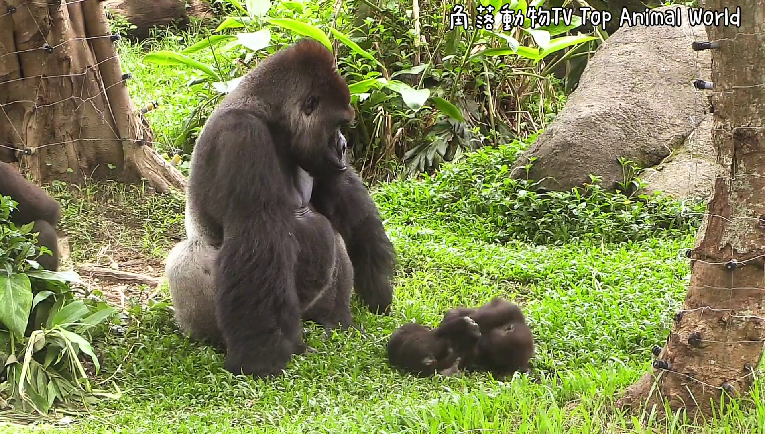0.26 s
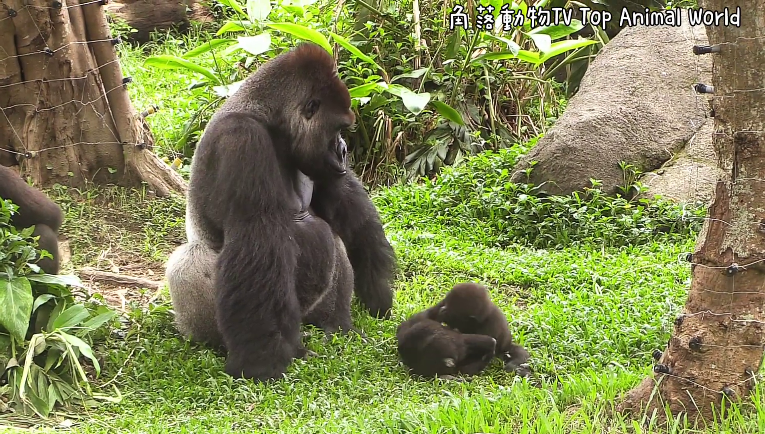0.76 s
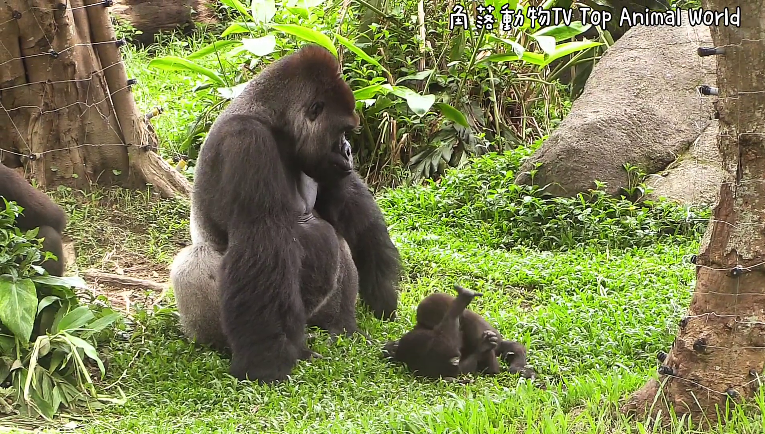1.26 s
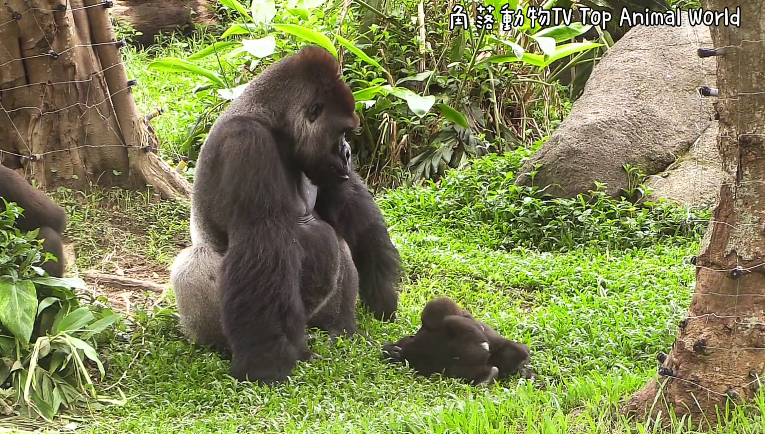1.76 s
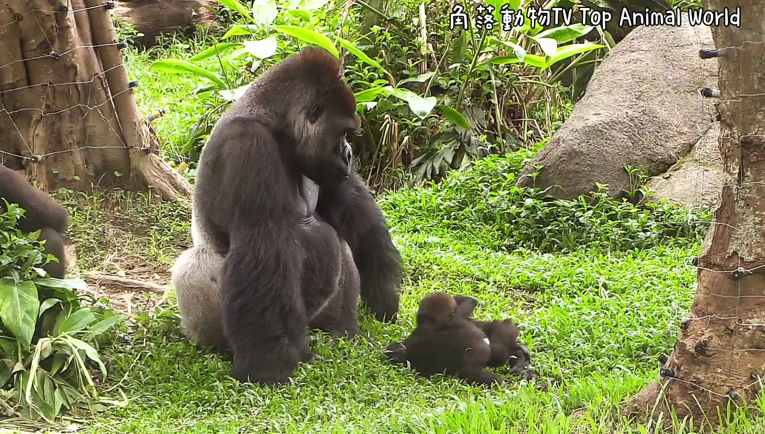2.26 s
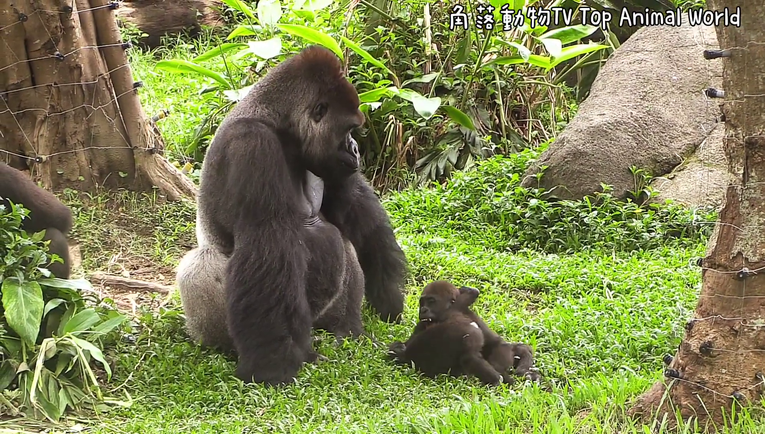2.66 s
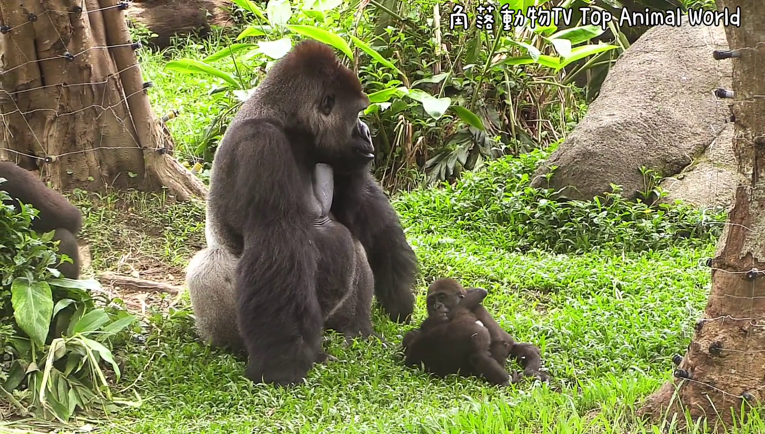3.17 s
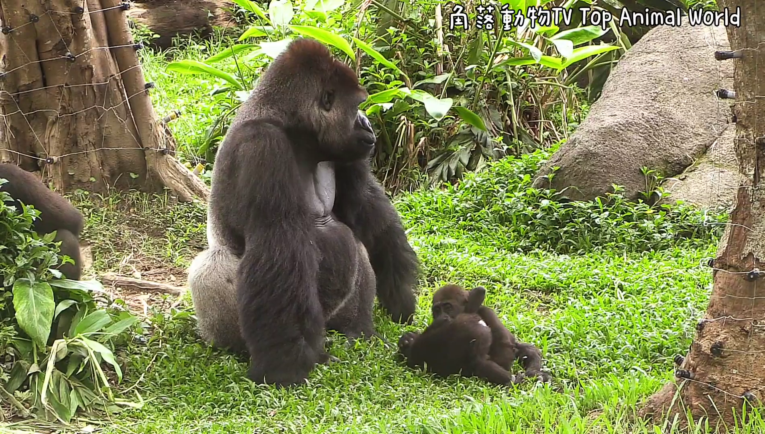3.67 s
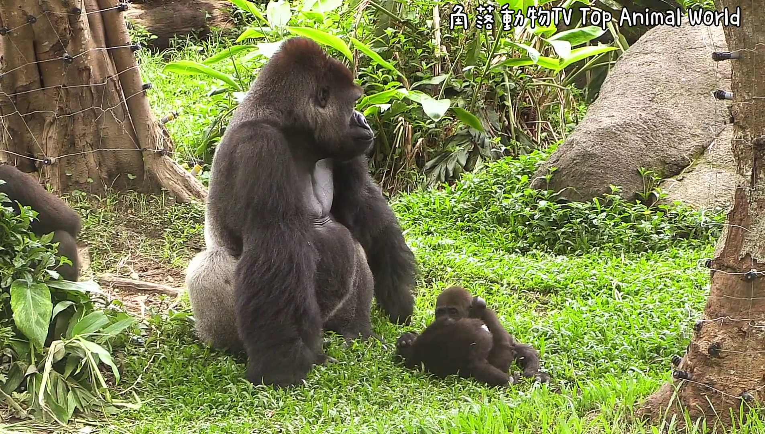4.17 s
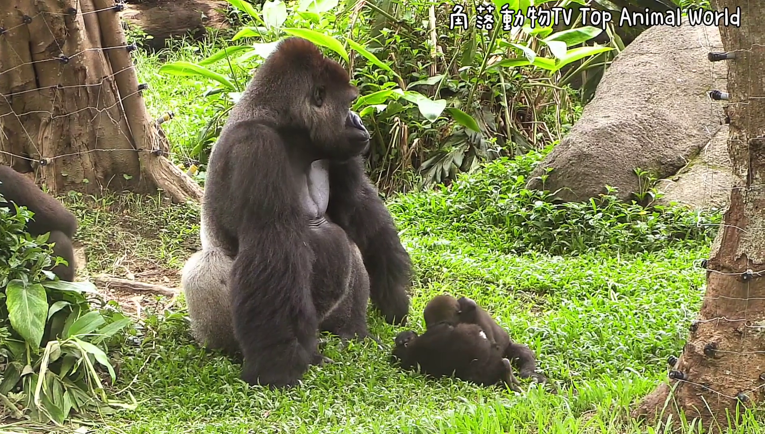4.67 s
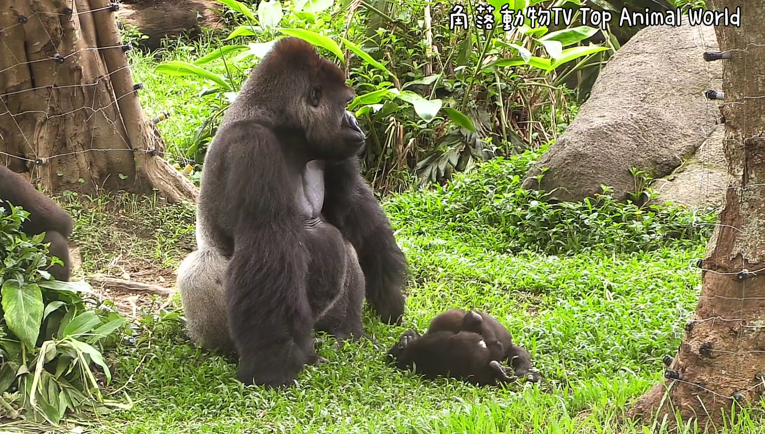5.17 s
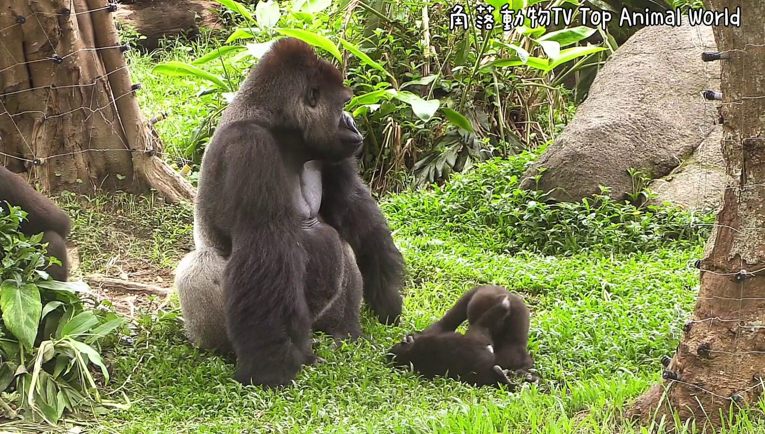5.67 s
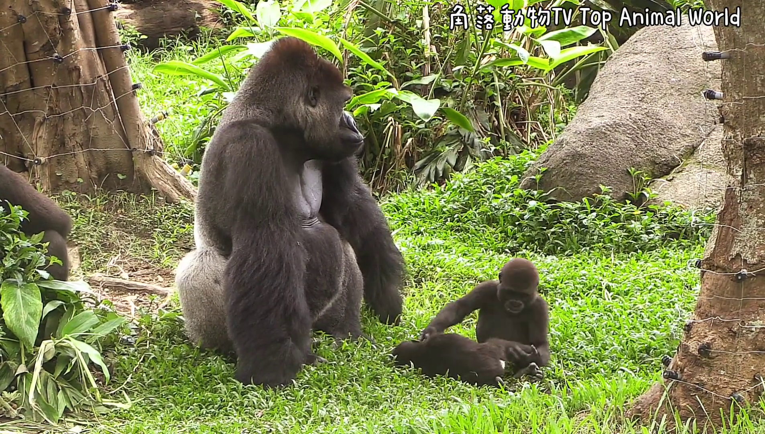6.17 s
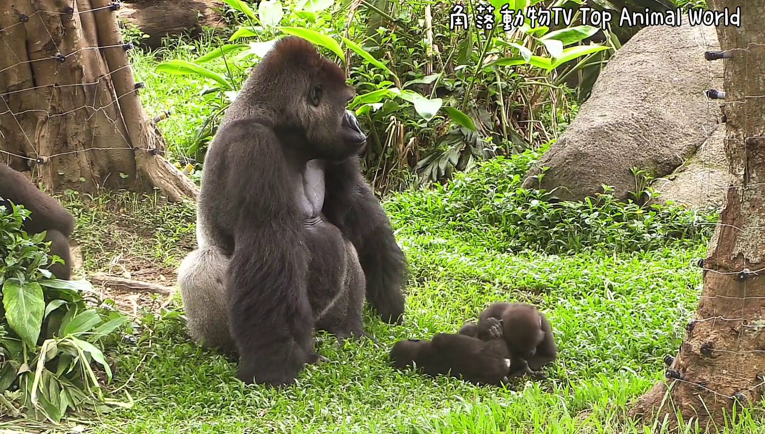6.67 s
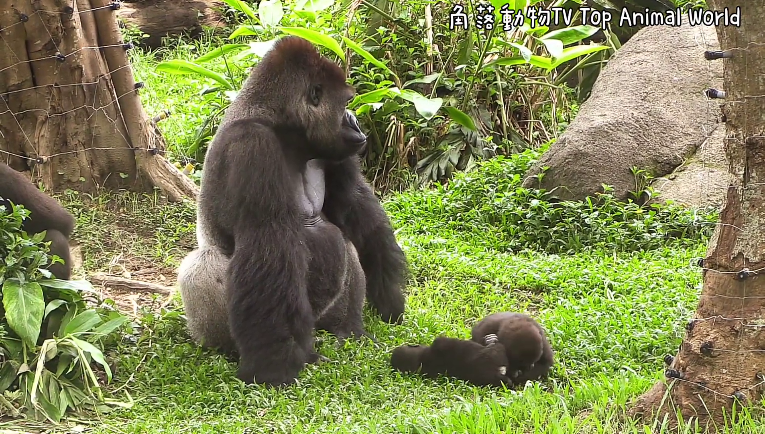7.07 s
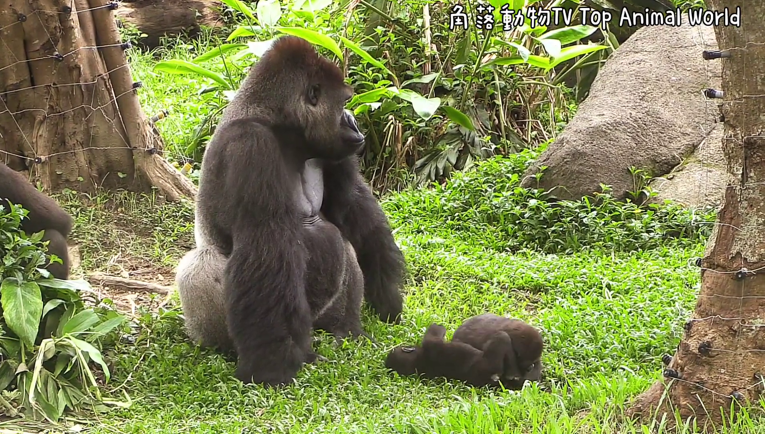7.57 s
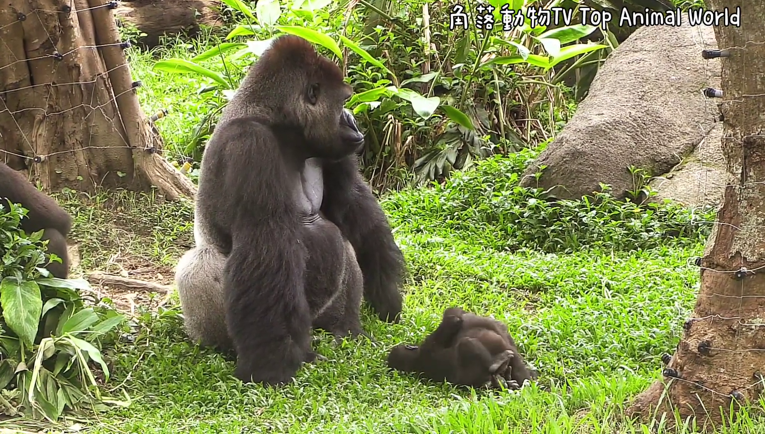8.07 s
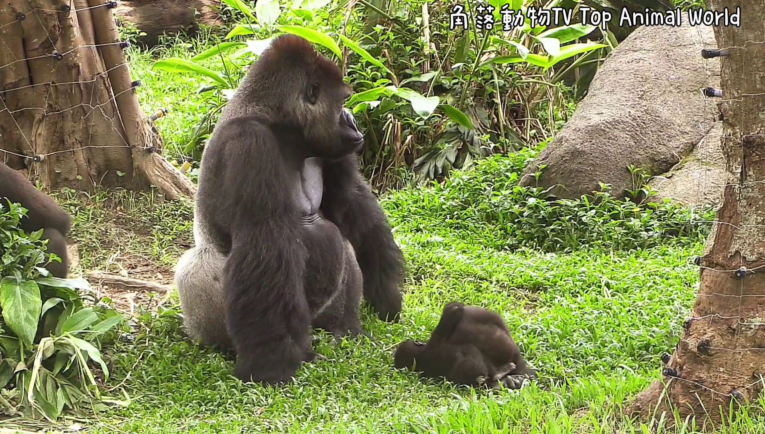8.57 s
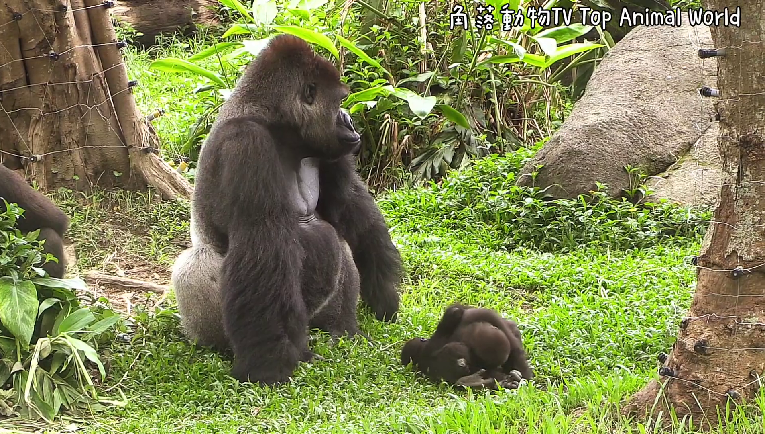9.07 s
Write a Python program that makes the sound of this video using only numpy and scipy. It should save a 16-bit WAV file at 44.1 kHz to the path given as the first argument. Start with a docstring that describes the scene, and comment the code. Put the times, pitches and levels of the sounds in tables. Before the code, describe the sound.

Quiet outdoor air and a thin, very high insect hiss lie beneath birdsong. Mellow, nearly pure whistles begin at left and are answered more strongly at right, while soft falling calls repeat farther off. The middle has an upward flick and quick buzz; later comes a long rising and sinking left whistle, then a warbling soft note among raspy chips. Wide stereo, at some distance, with short woody echo.

```python
"""From the start a bird whistles at the left in gliding near-sine tones, over a noise wash of outdoor air,
drifting hiss from insects, and a faint random chorus; thin high calls, chips and far falling calls soon join.
After 2 s a bird at the right answers, and the insect hiss sinks; near 4.5 s come one upward flick and a
buzzy double call. Past 6 s the left bird arches one long whistle; more flicks follow after 7 s, with chips.
A leafy enclosure of rocks and trunks adds early bounces, a decaying noise tail and late slaps to the birds."""
import sys
import numpy as np
from scipy import signal
from scipy.fft import rfft, irfft
from scipy.io import wavfile
from scipy.ndimage import uniform_filter1d

SR = 44100
rng = np.random.default_rng(int(sys.argv[2]) if len(sys.argv) > 2 else 0)


def wav_out(sig):
    """Save sig, one row per channel (or a flat mono array), as 16-bit PCM at SR to the path in sys.argv[1]."""
    wavfile.write(sys.argv[1], SR, np.round(np.clip(np.atleast_2d(sig).T, -1, 1) * 32767).astype(np.int16))


N = 411012  # samples, about 9.3 s


def gain_of(db):
    """Level law: an amplitude ratio is 10 to the power dB/20."""
    return 10 ** (np.asarray(db) / 20)


def evened(x):
    """Normalization: equal mean power, rms 1."""
    return x / np.sqrt(np.mean(x ** 2) + 1e-20)


def read(points, hz):
    """Logarithmic frequency scale: interpolates a table along it."""
    f, value = np.transpose(points)
    return np.interp(np.log(hz + 1), np.log(f + 1), value)


def add(mix, s, sound):
    """Superposition: sums a stereo sound into the mix at time s, trimmed to fit."""
    start = round(s * SR)
    sound = sound[:, max(-start, 0):]
    part = mix[:, max(start, 0):][:, :sound.shape[1]]
    part += sound[:, :part.shape[1]]


def wander(rate_hz):
    """Band-limited fluctuation: one second of Gaussian-filtered noise, rms 1."""
    hz = np.fft.rfftfreq(SR, 1 / SR)
    spectrum = rfft(rng.standard_normal(SR)) * np.exp(-(hz / rate_hz) ** 2)
    return evened(irfft(spectrum, SR))


def note(pan_db, warble_hz, rate, path, rasp_hz=16, flutter_db=2.4, overtone_db=-42, lag_per_db=1.6e-5):
    """Frequency modulation: a near-sine whistle glides along (t/s, f/Hz, level/dB) and warbles."""
    s, pitch, level = np.transpose(path)
    t = np.arange(s[0], max(s[-1], s[0] + .02), 1 / SR)
    hz = uniform_filter1d(np.interp(t, s, pitch), size=300)
    hz += rasp_hz * wander(250)[:len(t)]
    warble_rate = rate * (1 + .28 * wander(60)[:len(t)])  # no two shakes alike
    cycles = np.cumsum(warble_rate) / SR
    depth_hz = np.interp(t, s, warble_hz * np.ones(len(s)))
    hz += depth_hz * np.sin(2 * np.pi * cycles)

    ramp = np.clip(np.minimum(t - t[0], t[-1] - t) / .005, 0, 1)  # 5 ms at either end
    fade = np.sin(np.pi / 2 * ramp) ** 2
    flutter = flutter_db * wander(60)[:len(t)]
    loud = fade * gain_of(np.interp(t, s, level) + flutter)

    side = np.array([[.5], [-.5]]) * pan_db  # the nearer side hears it louder and sooner
    phase = 2 * np.pi * (np.cumsum(hz) / SR + hz * side * lag_per_db)
    tone = np.sin(phase) + gain_of(overtone_db) * np.sin(2 * phase)
    return s[0], np.sqrt(2) * loud * evened(gain_of(side)) * tone


def song(notes):
    """Superposition: the sum of a list of notes."""
    out = np.zeros((2, N))
    for row in notes:
        add(out, *note(*row))
    return out


EDGE_DROP_DB = 7  # softer at either end than at the loudest point
SWELL_SHAPE = 1.6  # 1 = pointed swell, 2 = rounded


def swell(share, db, loudest_at):
    """Amplitude envelope: level rises to its loudest point and sinks again."""
    peak = np.clip(loudest_at, .02, .98)
    distance = np.interp(share, [0, peak, 1], [1, 0, 1])
    return db - EDGE_DROP_DB * distance ** SWELL_SHAPE


def slur(start, length, first_hz, middle_hz, last_hz, db, loudest_at, warble_hz, rate, pan_db):
    """Parabolic glide: pitch bends in one smooth arc through three frequencies."""
    share = np.linspace(0, 1, 25)
    bow_hz = middle_hz - (first_hz + last_hz) / 2
    straight_hz = first_hz + (last_hz - first_hz) * share
    hz = straight_hz + bow_hz * (1 - (2 * share - 1) ** 2)
    path = np.transpose([start + length * share, hz, swell(share, db, loudest_at)])
    return pan_db, warble_hz, rate, path


THROAT_DB_PER_OCTAVE = 28  # fading as pitch leaves the throat's resonance
WHISTLE_RISE_S, WHISTLE_START_DB = .05, -9  # soft onset


def long_whistle(curve, db, throat_hz):
    """Resonance: a whistle's level falls with its distance in octaves from the throat's resonance."""
    s, pitch = np.transpose(curve)
    t = np.linspace(s[0], s[-1], 100)
    hz = np.interp(t, s, pitch)
    onset_db = WHISTLE_START_DB * np.clip(1 - (t - t[0]) / WHISTLE_RISE_S, 0, 1)
    detuning_db = THROAT_DB_PER_OCTAVE * abs(np.log2(hz / throat_hz))
    return np.transpose([t, hz, db + onset_db - detuning_db])


LEFT_PAN_DB = 6.5  # left minus right
# short whistles, before the enclosure: (t/s, length/s, first f/Hz, middle f/Hz, last f/Hz, level/dB,
# loudest point as share of length, warble depth f/Hz, mean warble rate f/Hz)
LEFT_NOTES = [ (-.02, .16, 2240, 2200, 2070, -45, .45, 300, 70),
              (.70, .06, 1590, 1690, 1950, -50, .7, 20, 50),
              (.752, .06, 1990, 2110, 2080, -44.5, .45, 10, 50),
              (.822, .105, 2040, 1990, 1900, -46.5, .5, 10, 50),
              (1.007, .04, 2010, 1880, 1770, -49, .6, 20, 50),
              (1.045, .16, 1730, 1720, 1730, -49.5, .35, 70, 42),
              (1.233, .105, 2310, 2225, 2080, -39, .35, 10, 50),
              (1.343, .068, 2100, 2250, 2255, -39, .45, 10, 50),
              (1.772, .115, 1920, 1990, 2040, -44, .6, 50, 55),
              (5.64, .105, 1370, 1460, 1580, -59.5, .7, 10, 50),
              (5.925, .065, 2100, 2010, 1880, -44, .35, 45, 30),
              (5.98, .25, 1880, 1860, 1810, -46.5, .25, 45, 30),
              (7.13, .11, 1720, 1690, 1640, -53, .45, 10, 50),
              (7.23, .055, 1660, 1520, 1320, -55, .15, 10, 50)]
# pitch curve of the long whistle: (t/s, f/Hz)
LEFT_LONG_WHISTLE = [(6.38, 1987), (6.41, 2020), (6.49, 2370), (6.538, 2690), (6.61, 2740), (6.69, 2660),
                     (6.774, 2029), (6.825, 1800), (6.868, 1450), (6.925, 1260)]


def left_bird(warble_hz=12, rate=40):
    """Gliding whistle: short slurs and one long, clean tone that climbs and sinks through resonance."""
    path = long_whistle(LEFT_LONG_WHISTLE, db=-40.5, throat_hz=2130)
    arch = (LEFT_PAN_DB, warble_hz, rate, path)
    return song([slur(*row, LEFT_PAN_DB) for row in LEFT_NOTES] + [arch])


# thin calls, before the enclosure: (t/s, length/s, first f/Hz, middle f/Hz, last f/Hz, level/dB,
# loudest point as share of length, warble depth f/Hz, mean warble rate f/Hz, left minus right level/dB)
SMALL_BIRD_NOTES = [ (-.02, .23, 7950, 7790, 7680, -56.5, .2, 30, 70, .7),
                    (.46, .05, 3620, 3660, 3700, -46.5, .4, 75, 165, 8),
                    (.75, .07, 3040, 3180, 3150, -57, .65, 10, 50, 8),
                    (.81, .125, 3150, 2980, 2900, -57, .3, 10, 50, 8),
                    (.985, .04, 2560, 2850, 2960, -50, .4, 40, 90, 10),
                    (1.57, .075, 2660, 2920, 2770, -46, .5, 50, 90, 5),
                    (1.67, .105, 2830, 2970, 3200, -47, .65, 30, 90, 5),
                    (3.76, .07, 8170, 8180, 8150, -55, .9, 20, 70, .5),
                    (3.825, .225, 8160, 8010, 7790, -46.5, .45, 40, 70, .5),
                    (4.07, .17, 7820, 7760, 7770, -51.5, .2, 30, 70, .5),
                    (7.49, .14, 7880, 7380, 7270, -63, .5, 60, 70, 0)]


def small_birds():
    """Frequency modulation: thin, warbling slurs, the highest near 8 kHz."""
    return song([slur(*row) for row in SMALL_BIRD_NOTES])


# decay time of the scattered tail, to -60 dB: (f/Hz, t/s)
DECAY_TIMES = [(1500, .68), (2300, .8), (4000, .6), (8000, .5)]
# late reflections from far walls, relative to the early bounces: (delay t/s, level/dB)
LATE_SLAPS = [(.21, -29), (.315, -33)]


def enclosure(x, direct_db, early_db, tail_db):
    """Reverberation: direct sound, bounces off ground and rock, a tail scattered by trees, late slaps."""
    count = 8  # bounces per channel
    early = np.zeros((2, SR))
    at = (rng.uniform(.002, .045, (2, count)) * SR).astype(int)
    signs = rng.choice([-1, 1], at.shape)
    np.put_along_axis(early, at, signs / np.sqrt(count), 1)

    hz, t, z = signal.stft(rng.standard_normal((2, SR)), SR, nperseg=256)
    decay = gain_of(-60 * t / read(DECAY_TIMES, hz)[:, None])
    z *= decay * (1 - np.exp(-t / .01))  # the tail builds up over about 10 ms
    tail = signal.istft(z, SR, nperseg=256)[1][:, :SR]
    tail = evened(tail) / np.sqrt(SR)  # unit mean energy per channel

    bounces = signal.fftconvolve(x, early, axes=1)[:, :N]
    crossed = x + .3 * x[::-1]  # some of each side reaches the other
    scattered = signal.fftconvolve(crossed, tail, axes=1)[:, :N]
    out = gain_of(direct_db) * x + gain_of(early_db) * bounces + gain_of(tail_db) * scattered
    for delay, db in LATE_SLAPS:
        add(out, delay, gain_of(db) * bounces[::-1])  # from the opposite side
    return out


AIR_DB = -62.5  # rms level
# relative spectral density of the outdoor air: (f/Hz, level/dB)
AIR_SPECTRUM = [(25, -24), (48, -23), (85, -34), (190, -29), (300, -21), (450, -10), (750, -3.5),
                (1300, -4), (2200, -2), (3500, -7), (4400, -7), (4720, -2), (5100, -9.5), (8500, -11),
                (15000, -11.5)]
# left-right coherence of the outdoor air: (f/Hz, correlation 0-1)
AIR_COHERENCE = [(30, .9), (80, .7), (200, 0), (3500, .05), (6500, .1), (8500, .95)]


def air():
    """Partial coherence: a steady noise wash of distant leaves and town, widest in mid-range."""
    hz = np.fft.rfftfreq(N, 1 / SR)
    a, b = rfft(rng.standard_normal((2, N)))
    same = np.clip(read(AIR_COHERENCE, hz), -1, 1)
    right = same * a + np.sqrt(1 - same ** 2) * b
    z = np.array([a, right]) * gain_of(read(AIR_SPECTRUM, hz))
    return gain_of(AIR_DB) * evened(irfft(z, N))


# relative spectral density of the insect hiss: (f/Hz, level/dB)
INSECT_SPECTRUM = [(7000, -43), (9300, -23), (10000, -15), (11200, -15), (11900, -9), (12400, -4),
                   (13200, -4), (14000, 0), (15450, -3), (15700, -40)]
# level course of the insect hiss: (t/s, level/dB)
INSECT_COURSE = [(0, -52), (2.35, -53), (2.65, -60.5), (3.1, -62), (3.25, -69.5), (4.2, -69.5), (4.8, -64),
                 (6.2, -63), (7.4, -61), (9.3, -62)]


def insects(ridge_db=3.8, flicker_db=1, width=.12):
    """Filtered noise: a high hiss with narrow spectral ridges that drift over seconds."""
    frames, hz = N // 512 + 5, np.fft.rfftfreq(2048, 1 / SR)
    a, b, c, d, ridges = rng.standard_normal((5, frames, len(hz)))
    ridges = uniform_filter1d(ridges, size=200, axis=0, mode="wrap")  # slow in time
    ridges = evened(uniform_filter1d(ridges, size=3, axis=1))  # narrow in frequency
    flicker = rng.standard_normal((frames, 1))  # all bins together, frame by frame
    colour = gain_of(read(INSECT_SPECTRUM, hz) + ridge_db * ridges + flicker_db * flicker)
    z = np.array([(a + 1j * b) * colour, (c + 1j * d) * colour]).transpose(0, 2, 1)
    mid, side = signal.istft(z, nperseg=2048, noverlap=1536)[1][:, :N]
    level = np.interp(np.arange(N) / SR, *np.transpose(INSECT_COURSE))
    stereo = np.array([mid + width * side, mid - width * side])
    return gain_of(level) * evened(stereo)


def chorus(count=110, low_hz=1800, high_hz=2500, glide=.12, level_db=-73):
    """Random superposition: many birds far away slur short notes at chance times and pitches."""
    notes = []
    for when, height, bend, strength in rng.random((count, 4)):
        s = when * N / SR
        hz = low_hz + (high_hz - low_hz) * height
        db = level_db + 6 * (strength - .5)
        last_hz = hz * (1 + glide * (2 * bend - 1))
        notes.append((0, 40, 50, [(s, hz, db), (s + .13, last_hz, db)]))
    return song(notes)


RASP_HZ = 330  # rms of the random pitch shake
# distant raspy chips, and at 4.565 s an overtone of the buzzy call, before the enclosure:
# (t/s, length/s, first f/Hz, last f/Hz, level/dB)
RASPY_SWEEPS = [(.24, .08, 5850, 5720, -69), (3.57, .06, 7900, 8150, -64), (4.565, .05, 7400, 6300, -68),
                (4.642, .03, 4350, 4950, -62), (7.46, .10, 3100, 3200, -59), (7.47, .11, 2300, 2000, -60),
                (7.71, .12, 6600, 6200, -67), (7.895, .12, 5080, 4920, -62), (8.0, .09, 2850, 3200, -64),
                (8.445, .045, 4600, 4050, -57), (8.53, .08, 4600, 3800, -60), (8.63, .09, 6500, 7100, -64),
                (8.71, .08, 7000, 5500, -65)]


def chips_and_buzz_overtone():
    """Random frequency modulation: quick sweeps whose pitch shakes so fast that they rasp."""
    notes = []
    for s, length, first_hz, last_hz, db in RASPY_SWEEPS:
        path = [(s, first_hz, db), (s + length, last_hz, db)]
        notes.append((0, 0, 0, path, RASP_HZ))
    return song(notes)


def fall(start, length, db, top_hz, end_hz, bend, loudest_at):
    """Power-law glide: pitch hangs at the top and then drops; more bend, later drop."""
    share = np.linspace(0, 1, 25)
    hz = top_hz + (end_hz - top_hz) * share ** bend
    return np.transpose([start + length * share, hz, swell(share, db, loudest_at)])


# top f/Hz, end f/Hz, bend exponent, loudest point as share of length
DOWNSLUR_SHAPE = 3100, 2300, 1.7, .35
BUZZ_SHAPE = 3620, 1650, 3, .4
BUZZ_PAN_DB, BUZZ_DEPTH_HZ, BUZZ_PER_S = -6, 120, 160  # left minus right; warble depth and mean rate
# soft whistles, before the enclosure: (t/s, length/s, first f/Hz, middle f/Hz, last f/Hz, level/dB,
# loudest point as share of length, warble depth f/Hz, mean warble rate f/Hz, left minus right level/dB)
FAR_NOTES = [ (.28, .10, 2870, 2710, 2640, -58, .25, 5, 50, -4),
             (2.2, .15, 2330, 2320, 2270, -61, .7, 10, 50, 0),
             (4.295, .02, 2250, 2550, 2750, -51, .4, 100, 160, -3),
             (5.25, .11, 2080, 2110, 2150, -59, .6, 20, 50, 0),
             (5.47, .14, 2380, 2300, 2250, -57, .6, 130, 70, 2),
             (5.725, .04, 1720, 1880, 2100, -54, .6, 150, 110, 3),
             (5.72, .135, 2650, 2520, 2420, -52.5, .6, 340, 65, 5),
             (7.085, .19, 2220, 2370, 2310, -49.5, .4, 110, 50, 0),
             (7.71, .10, 1600, 1650, 1620, -57, .4, 10, 50, 0),
             (7.828, .06, 2320, 2190, 1950, -50, .4, 60, 50, 0),
             (7.87, .07, 1850, 1650, 1540, -54, .3, 30, 50, 0),
             (8.045, .30, 2320, 2350, 2270, -45, .25, 100, 48, 1)]
# repeated falling call, before the enclosure:
# (t/s, length/s, level/dB, left minus right level/dB, warble depth f/Hz)
FALLING_CALLS = [ (1.228, .10, -54, -2, 20), (1.765, .115, -52, 1, 20), (2.33, .13, -50, -3, 20),
                 (2.945, .135, -52.5, -3, 20), (3.595, .12, -51, -3, 20), (4.29, .115, -48, -3, 40),
                 (5.372, .055, -56, 0, 160), (5.455, .06, -58, 0, 160), (5.617, .06, -57, 2, 180),
                 (5.915, .135, -58, 0, 90), (6.255, .05, -55, 0, 60), (6.335, .04, -60, 0, 60),
                 (6.605, .13, -56.5, 0, 40), (7.03, .075, -56.5, 0, 110)]
# halves of the buzzy double call, before the enclosure: (t/s, length/s, level/dB)
BUZZ_HALVES = [(4.558, .07, -47.5), (4.678, .065, -47.5)]


def far_birds(downslur_rate=50):
    """Frequency modulation: soft slurs, a repeated falling call and a fast-warbling, plunging double call."""
    notes = [slur(*row) for row in FAR_NOTES]
    for s, length, db, pan_db, warble_hz in FALLING_CALLS:
        path = fall(s, length, db, *DOWNSLUR_SHAPE)
        notes.append((pan_db, warble_hz, downslur_rate, path))
    for row in BUZZ_HALVES:
        notes.append((BUZZ_PAN_DB, BUZZ_DEPTH_HZ, BUZZ_PER_S, fall(*row, *BUZZ_SHAPE)))
    return song(notes)


# thin insect tones, levels before the trim: (start t/s, end t/s, [(f/Hz, level/dB), ..])
WHINE_LINES = [(.7, 2.6, [(13840, -70), (13997, -68), (14137, -70), (14869, -71)]),
               (7.6, 9.8, [(12398, -74), (13001, -75), (13604, -74), (14497, -75), (15240, -76)])]


def whines(waver_hz=10, trim_db=3):
    """Narrow-band tones: single insects hold slightly wavering sines."""
    t, out = np.arange(N) / SR, np.zeros(N)
    for start, end, lines in WHINE_LINES:
        ramp = np.clip(np.minimum(t - start, end - t) / .4, 0, 1)
        for hz, db in lines:
            waver = evened(uniform_filter1d(rng.standard_normal(N), size=600))
            phase = 2 * np.pi * np.cumsum(hz + waver_hz * waver) / SR
            out += ramp * gain_of(db + trim_db) * np.sqrt(2) * np.sin(phase)
    return out


RIGHT_PAN_DB = -8.5  # left minus right
# short whistles, before the enclosure: (t/s, length/s, first f/Hz, middle f/Hz, last f/Hz, level/dB,
# loudest point as share of length, warble depth f/Hz, mean warble rate f/Hz)
RIGHT_NOTES = [ (2.40, .07, 1620, 1750, 1790, -42.5, .65, 10, 50),
               (2.465, .12, 1950, 1900, 1850, -47, .35, 260, 62),
               (2.66, .06, 2170, 2130, 2100, -45, .7, 10, 50),
               (2.718, .025, 2120, 2170, 2250, -35.5, .4, 10, 50),
               (2.738, .105, 2400, 2510, 2430, -35.5, .45, 125, 58),
               (2.84, .095, 2390, 2330, 2310, -39, .25, 70, 58),
               (2.972, .034, 2090, 2020, 1950, -38, .3, 35, 33),
               (3.014, .042, 1930, 1900, 1900, -35.5, .25, 25, 33),
               (3.07, .042, 1910, 1910, 1780, -36.5, .3, 25, 33),
               (3.17, .20, 2000, 2050, 2070, -49, .95, 70, 22),
               (4.312, .05, 2230, 2200, 2150, -40, .25, 20, 50),
               (4.372, .03, 2190, 2130, 2020, -36.5, .7, 20, 50),
               (4.4, .043, 1980, 1690, 1490, -35.5, .2, 10, 50)]
# pitch curve of the loud climbing whistle: (t/s, f/Hz)
RIGHT_CLIMB = [(3.365, 2139), (3.401, 2201), (3.459, 2229), (3.549, 2368), (3.567, 2552), (3.635, 2928)]
# slow swelling whistle, before the enclosure: (t/s, f/Hz, level/dB, warble depth f/Hz)
RIGHT_SWELLING = [(3.875, 1290, -63, 30), (3.985, 1660, -46.5, 160), (4.045, 1700, -46, 130),
                  (4.068, 1800, -39, 10), (4.115, 1855, -37.5, 20), (4.21, 1880, -38.5, 105),
                  (4.255, 1890, -47, 90)]


def right_bird(warble_hz=35, rate=27, swell_rate=62):
    """Gliding whistle: short slurs, a loud climb through resonance and a tone that swells from low down."""
    path = long_whistle(RIGHT_CLIMB, db=-29.2, throat_hz=2510)
    rise = (RIGHT_PAN_DB, warble_hz, rate, path)
    curve = np.array(RIGHT_SWELLING)
    swelling = (RIGHT_PAN_DB, curve[:, 3], swell_rate, curve[:, :3])
    return song([slur(*row, RIGHT_PAN_DB) for row in RIGHT_NOTES] + [rise, swelling])


FLICK_START, FLICK_BEND = .6, 1.5  # first pitch as share of the top; bend exponent
FLICK_RASP_HZ = 90  # rms of the random pitch shake
# a small bird's upward flicks, before the enclosure: (t/s, length/s, top f/Hz, level/dB)
FLICK_SWEEPS = [(4.528, .024, 6100, -55), (7.39, .035, 4600, -64), (7.66, .045, 4700, -63),
                (8.108, .045, 4650, -57), (8.208, .045, 4450, -59), (8.322, .045, 4550, -61)]


def flicks():
    """Power-law glide: thin, nearly clean upward sweeps that slow near the top."""
    share = np.linspace(0, 1, 25)
    climb = 1 - (1 - FLICK_START) * (1 - share) ** FLICK_BEND
    notes = []
    for s, length, top_hz, db in FLICK_SWEEPS:
        path = np.transpose([s + length * share, top_hz * climb, np.full_like(share, db)])
        notes.append((0, 0, 0, path, FLICK_RASP_HZ))
    return song(notes)


def scene():
    """Direct-to-reverberant ratio: near birds are mostly direct sound, far ones mostly echo."""
    left = enclosure(left_bird(), direct_db=-1.5, early_db=-7, tail_db=-11)
    small = enclosure(small_birds(), direct_db=-1, early_db=-8, tail_db=-11)
    far = enclosure(far_birds() + chorus(), direct_db=-9, early_db=-4, tail_db=-5.5)
    rasps = enclosure(chips_and_buzz_overtone(), direct_db=-6, early_db=-4, tail_db=-5.5)
    right = enclosure(right_bird(), direct_db=-2.5, early_db=-5.5, tail_db=-11.3)
    thin = enclosure(flicks(), direct_db=-8, early_db=-8, tail_db=-7)
    return left + small + air() + insects() + far + rasps + whines() + right + thin


EDGE_HZ = 15540  # upper band limit


def record(dry):
    """Band limitation: a linear-phase low-pass ends the treble at the band edge."""
    lowpass = signal.firwin(1023, EDGE_HZ, window=("kaiser", 9), fs=SR)
    return signal.oaconvolve(dry, lowpass[None], "same")


dry = scene()
out = record(dry)
wav_out(out)
```